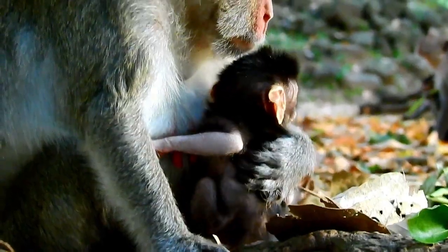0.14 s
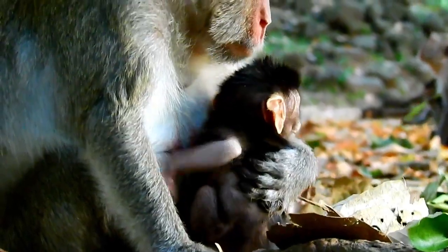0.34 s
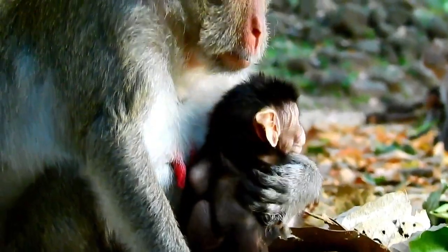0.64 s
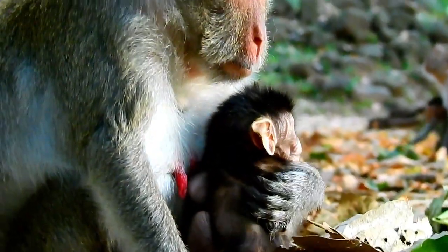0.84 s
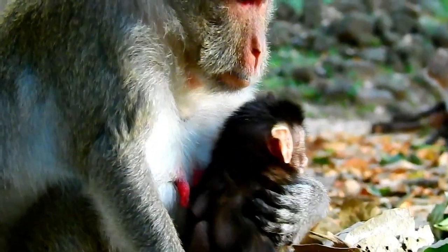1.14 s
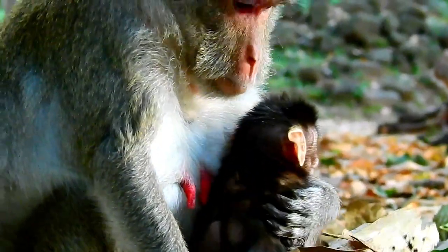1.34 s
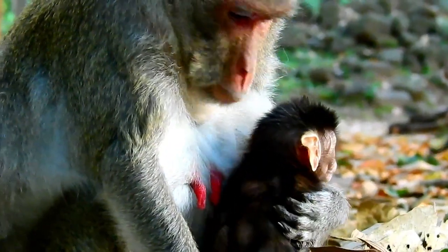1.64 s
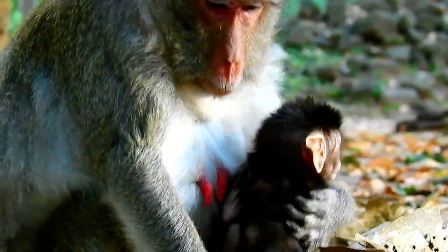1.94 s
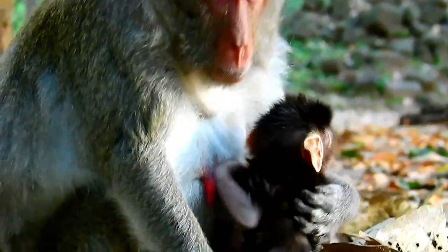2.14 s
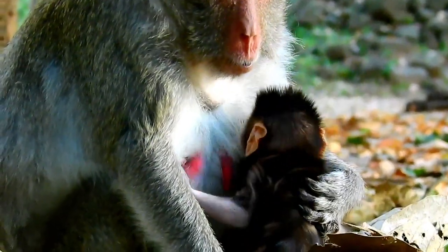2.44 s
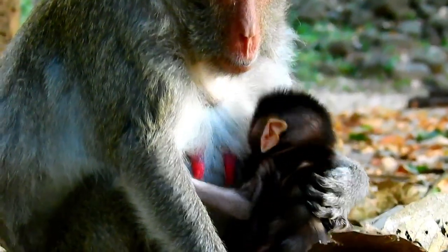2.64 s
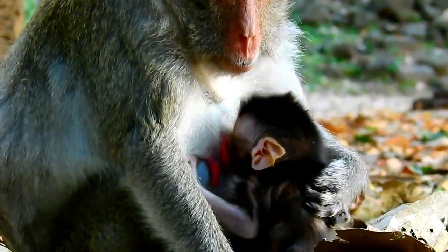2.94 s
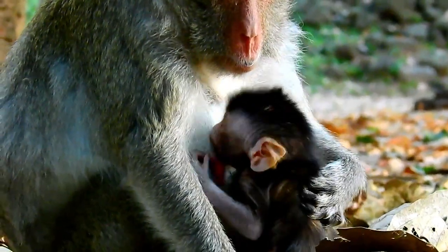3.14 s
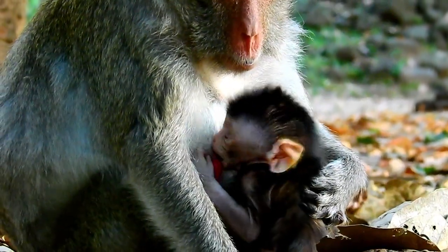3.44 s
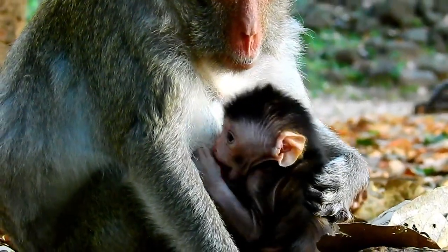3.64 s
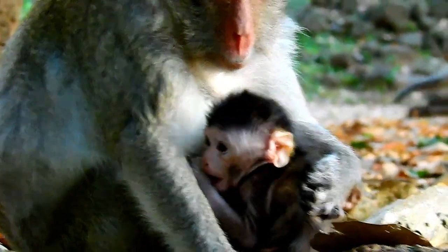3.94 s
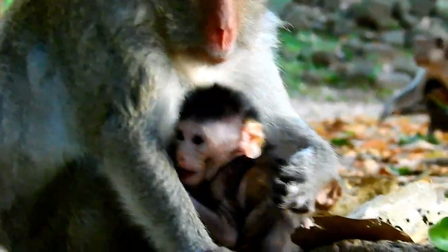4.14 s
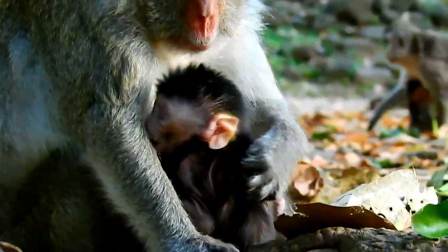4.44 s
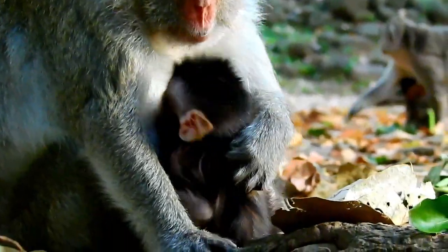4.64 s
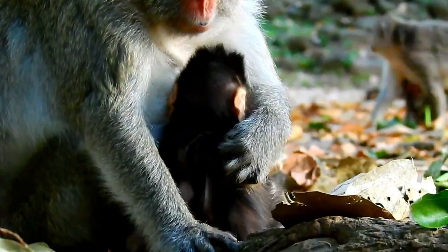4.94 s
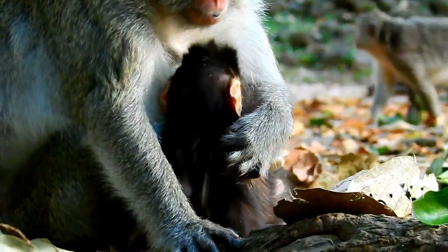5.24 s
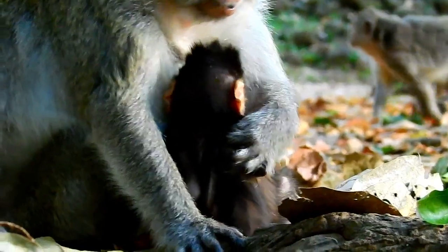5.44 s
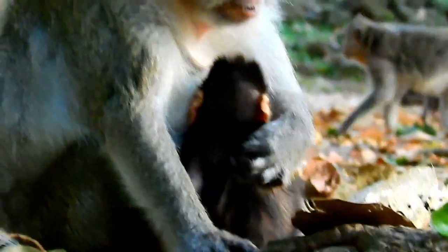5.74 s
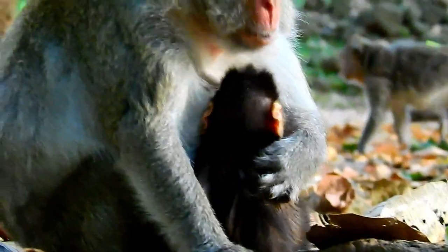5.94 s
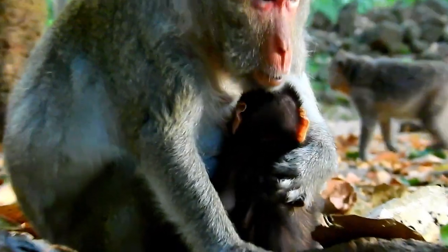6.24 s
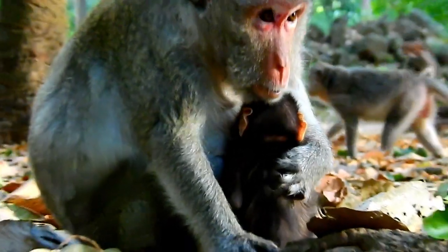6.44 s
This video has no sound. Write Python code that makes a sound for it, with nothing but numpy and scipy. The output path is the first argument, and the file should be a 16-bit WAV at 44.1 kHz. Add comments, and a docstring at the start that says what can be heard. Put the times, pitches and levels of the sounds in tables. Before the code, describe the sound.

An infant monkey close to a stereo microphone outdoors: faint whimper, quiet sliding coos, then shrill rasping squeals that break into whistles, building to one tearing scream. It fades to small broken chirps and breathy squeals with a brief woody reverberation. Behind it a far motor throbs, clatters and hisses by, sinks away, returns as a low idle later, and a faint thin whine appears at the end.

```python
"""Thin, breathy whimpers are heard first, then mostly falling coos, from a baby monkey on a forest floor;
whistles break into hoarse squeals, with one harsh scream in the middle and weaker, breathier cries after it.
The voice is wavering fold tones and puffed noise shaped by throat, mouth and teeth; trees give it a tail.
A small engine, puffing and clattering noise, putters past some way off; a faint tone whines at the end."""
import sys
import numpy as np
from scipy import signal
from scipy.fft import rfft, irfft
from scipy.io import wavfile
from scipy.ndimage import uniform_filter1d

SR = 44100
rng = np.random.default_rng(int(sys.argv[2]) if len(sys.argv) > 2 else 0)


def unload_audio(sound):
    """Save the sound as a 16-bit wav file, at the path given as the first command line argument."""
    columns = np.transpose(np.atleast_2d(sound))
    # keep every value between -1 and 1, then stretch to whole-number steps
    steps = np.round(np.clip(columns, -1, 1) * 32767)
    wavfile.write(sys.argv[1], SR, steps.astype(np.int16))


N = 290663
TIME = np.arange(N) / SR

# All levels are relative. A swell is the level change from the start to the end of the held part.
# Cries by kind [start t/s, length t/s, first pitch f/Hz, last pitch f/Hz, level/dB, swell/dB]:
# clear coos, mostly falling
COO_CRIES = [(.82, .22, 4170, 3432, -54.5, 5.5), (1.035, 0.11, 3403, 2285, -50.5, -12),
             (1.135, 0.2, 2310, 1698, -47.5, -10), (1.4, 0.079, 2130, 1997, -56.5, -3),
             (1.525, 0.13, 1952, 1852, -56, -16), (1.68, 0.13, 1702, 1593, -55.5, -26),
             (2.54, .18, 3193, 3080, -52.5, 4), (2.73, 0.11, 3130, 3490, -53.5, 9),
             (4.645, .125, 2777, 2060, -57.5, 12), (5.055, 0.18, 3084, 2025, -43.5, 5)]
# squeals, the folds' lower register
SQUEAL_CRIES = [(1.695, 0.25, 3807, 3280, -38, -10.5), (2.236, 0.24, 2985, 2704, -36.5, -5.5),
                (2.822, .21, 3780, 2758, -30.5, -4.5), (3.483, .11, 3747, 3787, -40.5, -8),
                (4.272, 0.046, 3685, 3350, -55.5, 1.5), (4.903, 0.084, 3126, 3150, -46.5, 9),
                (5.43, 0.064, 2800, 2927, -56.5, -4), (5.79, 0.17, 3146, 3368, -43, -3.5)]
# the voice cracks into a low rasp
CRACKED_CRIES = [(1.72, .12, 3172, 2810, -53, -11), (1.83, .11, 2800, 2170, -45.5, -4),
                 (2.33, 0.074, 2417, 1981, -47, 13), (2.45, 0.18, 1865, 1655, -57, -0.5),
                 (5.44, 0.112, 2400, 2287, -59.5, -19)]
# thin whistles, the upper register
WHISTLE_CRIES = [(1.61, .1, 6900, 5980, -42, 18), (1.77, .1, 6790, 6430, -31.5, 1),
                 (2.04, 0.078, 6310, 7660, -34.5, 7), (2.125, 0.14, 8190, 6100, -41, 10),
                 (2.37, .04, 6200, 6020, -33, -3), (4.447, 0.019, 8850, 9010, -52, -12),
                 (4.612, 0.075, 6400, 6130, -52.5, 15), (4.86, 0.0388, 6500, 6350, -49, 1),
                 (5.362, 0.043, 8280, 8150, -51, -6), (5.44, 0.054, 7950, 6920, -41.5, 6),
                 (5.735, .11, 9440, 7320, -65, -17)]
# breathy whimpers in the upper register
WHIMPER_CRIES = [(.49, 0.047, 6400, 6100, -53.5, 6), (.529, 0.083, 6260, 5740, -47.5, -8),
                 (.618, 0.16, 5750, 6450, -46, -4), (2.72, 0.097, 6450, 6300, -41.5, 13),
                 (3.185, .065, 6100, 6800, -34.5, 0), (3.459, 0.059, 6380, 6530, -47, 2),
                 (4.292, 0.0468, 6680, 6450, -55, -5), (6.03, 0.086, 6200, 6550, -44.5, -3),
                 (6.17, 0.13, 6100, 5550, -71, 9)]


def tonal_cries():
    """Register: coos and rough cracks bend slightly early, squeals earlier, whistles late; whimpers are
    breathy."""
    coos = cries(COO_CRIES, attack_s=0.011, release_s=0.023, bend=0.8, flutter_db=3.0,
                 waver=0.01042, rough=0.18, spread_hz=144, overtones_db=[-36])
    squeals = cries(SQUEAL_CRIES, attack_s=0.02, release_s=0.04, bend=0.6, flutter_db=2.1,
                    waver=0.022, rough=0.46, spread_hz=330, overtones_db=[-9, -13])
    cracks = cries(CRACKED_CRIES, attack_s=0.047, release_s=0.097, bend=0.78, flutter_db=4.0,
                   waver=0.04, rough=0.94, spread_hz=220, overtones_db=[-7])
    whistles = cries(WHISTLE_CRIES, attack_s=0.012, release_s=0.031, bend=3.2, flutter_db=1.5,
                     waver=0.013, rough=0.61, spread_hz=190, overtones_db=[])
    whimpers = cries(WHIMPER_CRIES, attack_s=0.01, release_s=0.02, bend=1.0, flutter_db=1.5,
                     waver=0.016, rough=0.6, spread_hz=550, overtones_db=[])
    return coos + squeals + cracks + whistles + whimpers


# hoarse air in the cries [start t/s, length t/s, attack t/s, throat level/dB, open mouth level/dB,
# hiss at the teeth level/dB, swell/dB, mouth resonance f/Hz]
HOARSE_AIR = [(1.29, 0.37, 0.01, -44, -60, -63, 10.5, 4674),
              (1.687, 0.26, 0.031, -32.5, -37.5, -52.5, -8.5, 4360),
              (2.005, 0.16, 0.017, -38, -52.5, -49, -4, 4500),
              (2.215, .22, 0.038, -31, -40, -47, -2.5, 4296),
              (2.675, 0.15, .02, -67, -54.5, -46.5, 8, 4500),
              (2.801, 0.22, 0.063, -27, -38, -45.5, -1, 4540),
              (3.141, .11, 0.037, -38, -40.5, -45.5, -8.5, 4800),
              (3.47, .14, 0.057, -35, -34, -65, -9, 4420), (4.024, 0.05, 0.018, -59, -46, -76, 6, 5000),
              (4.271, 0.045, 0.022, -72, -51.5, -84, -5.5, 3950),
              (4.455, 0.058, 0.032, -69.5, -91, -77.5, 1, 4505),
              (4.608, 0.081, 0.071, -54, -58, -66.5, 0.5, 4530),
              (4.845, 0.28, 0.17, -36.5, -45, -42, -17, 4943),
              (5.397, 0.15, 0.065, -42, -55, -47.5, 2.5, 4525),
              (5.752, 0.26, 0.1, -40, -48, -44.5, -6.5, 4520),
              (5.959, 0.14, 0.034, -59, -66, -50, -14, 4575),
              (6.121, 0.19, 0.034, -89, -68, -63.5, -11, 5240),
              (6.538, 0.051, 0.014, -74, -63, -64.5, 13, 5190)]
# noise colour of the throat [f/Hz, density level/dB per Hz]
THROAT_COLOUR = [(3900, -56), (4500, -33), (5300, -12), (6000, 6), (6700, 13), (7600, -7.5), (8600, -19),
                 (10000, -13), (13000, -46.5)]
# noise colour of the open mouth [f/Hz, density level/dB per Hz]
MOUTH_COLOUR = [(3000, -40.5), (3850, -14.5), (4200, -12), (4550, -8), (5000, -2), (5500, 1.5),
                (7000, -49.5)]
# noise colour of the hiss at the teeth [f/Hz, density level/dB per Hz]
TEETH_COLOUR = [(5000, -35.5), (8000, 2), (10000, 7.5), (11500, -2.5), (13000, -19.5), (14500, -33.5),
                (15700, -39)]
# air reaches the teeth first, then fills throat and mouth: (onset delay t/s, release t/s)
TEETH_TIMING, THROAT_TIMING, MOUTH_TIMING = (-0.027, 0.05), (0.0069, 0.041), (0.014, 0.017)
MOUTH_RING_DB, MOUTH_WIDTH_HZ = 0, 430  # the mouth's resonance against its broad rush of air


def rasp():
    """Turbulence: air torn by straining folds puffs unevenly through throat, teeth and a mouth reshaped per cry."""
    start_s, length_s, attack_s, throat_db, mouth_db, teeth_db, swell_db, mouth_hz = np.transpose(HOARSE_AIR)
    puffs = from_db(1.33 * drift(180))

    ringing = throat_rings(wander=0.025, swell_db=3.5)
    throat = (noise(THROAT_COLOUR, puffs) + np.sqrt(2) * ringing) / np.sqrt(3)

    centre_hz = glides(start_s, length_s, mouth_hz, mouth_hz, bend=1)
    mouth_ring = folds(centre_hz, waver=0.025, rough=0.8, spread_hz=MOUTH_WIDTH_HZ, overtones_db=[])
    mouth = rms_one(noise(MOUTH_COLOUR, puffs) + from_db(MOUTH_RING_DB) * mouth_ring)

    teeth = noise(TEETH_COLOUR, puffs)
    parts = [(throat, throat_db, THROAT_TIMING), (mouth, mouth_db, MOUTH_TIMING), (teeth, teeth_db, TEETH_TIMING)]
    total = 0
    for air, db, (delay_s, release_s) in parts:
        level = envelope(zip(start_s, length_s, attack_s, db, swell_db), release_s, delay_s)
        total = total + air * from_db(1.1 * drift(30)) * level
    return total


# shrill resonances of the throat [f/Hz, half width f/Hz, level/dB]
THROAT_RESONANCES = [(5900, 220, -7), (6500, 350, -4.5), (7430, 460, 0.5), (8500, 400, -5.5)]


def throat_rings(wander, swell_db):
    """Resonance: the strained throat changes shape, so each mode slides and swells on its own; unit power."""
    out = 0
    for hz, width_hz, db in THROAT_RESONANCES:
        phase = 2 * np.pi * np.cumsum(hz * (1 + wander * drift(14))) / SR
        ring = drift(width_hz) * np.cos(phase) + drift(width_hz) * np.sin(phase)
        out = out + from_db(db + swell_db * drift(16)) * ring
    power = uniform_filter1d(out ** 2, SR // 25)
    return rms_one(out / np.sqrt(power + 1e-9))  # evens out the level over 40 ms


# the scream, a short catch and then full force [start t/s, length t/s, attack t/s, level/dB,
# low resonance level/dB, low tone level/dB, low tone f/Hz, swell/dB]
SCREAM_BURSTS = [(3.652, .055, 0.018, -29, -55.5, -39.5, 1320, 0.5),
                 (3.73, 0.18, 0.033, -21, -36, -35, 1354, -6.5)]
# main noise colour of the scream [f/Hz, density level/dB per Hz]
SCREAM_HIGH_COLOUR = [(2600, -65), (3300, -10), (3800, 0.5), (5300, 4.5), (6000, 3.5), (6700, 0),
                      (7500, -14.5), (8300, -40.5), (9300, -36), (10100, -23.5), (12000, -44.5),
                      (15000, -64)]
# noise colour of its low resonance [f/Hz, density level/dB per Hz]
SCREAM_LOW_COLOUR = [(450, -48), (700, -39), (950, -23.5), (1150, -6.5), (1350, -1), (1650, -5), (1850, -9),
                     (2050, -1), (2300, 5), (2500, -7), (2750, -3.5), (3100, -5), (4200, -54)]


def scream():
    """Deterministic chaos: at full force the folds vibrate chaotically, as noise, over a rough low tone."""
    start_s, length_s, attack_s, high_db, low_db, tone_db, tone_hz, swell_db = np.transpose(SCREAM_BURSTS)
    puffs = from_db(0.77 * drift(300))
    pitch = glides(start_s, length_s, tone_hz, tone_hz, bend=1)
    tone = folds(pitch, waver=0.022, rough=0.6, spread_hz=78, overtones_db=[-22, -8, -6])
    high, low = noise(SCREAM_HIGH_COLOUR, puffs), noise(SCREAM_LOW_COLOUR, puffs)
    total = 0
    for sound, db in [(high, high_db), (low, low_db), (tone, tone_db)]:
        total = total + sound * envelope(zip(start_s, length_s, attack_s, db, swell_db), release_s=0.064)
    return total


def cries(table, attack_s, release_s, bend, flutter_db, waver, rough, spread_hz, overtones_db):
    """Source and modulation: the folds play cries of one kind, each a glide under an unsteady envelope."""
    start_s, length_s, first_hz, last_hz, db, swell_db = np.transpose(table)
    level = envelope(zip(start_s, length_s, [attack_s] * len(table), db, swell_db), release_s)
    pitch = glides(start_s, length_s, first_hz, last_hz, bend)
    flutter = from_db(flutter_db * drift(23))
    return level * flutter * folds(pitch, waver, rough, spread_hz, overtones_db)


def folds(pitch, waver, rough, spread_hz, overtones_db):
    """Self-oscillation: pitch wavers and a rough share of the power smears to both sides of each partial."""
    phase = 2 * np.pi * np.cumsum(pitch * (1 + waver * drift(90))) / SR
    rough = np.clip(rough, 0, 1)
    wave = 0
    for k, db in enumerate([0] + overtones_db, 1):
        smear = drift(k * spread_hz) + 1j * drift(k * spread_hz)
        swing = np.sqrt(1 - rough) + np.sqrt(rough / 2) * smear
        wave = wave + from_db(db) * np.real(swing * np.exp(1j * k * phase))
    return rms_one(wave)


def envelope(rows, release_s, delay_s=0):
    """Amplitude modulation: each cry eases in, swells or sags evenly in dB while held, and is let go."""
    out = np.zeros(N)
    for start_s, length_s, attack_s, db, swell_db in rows:
        span = slice(*np.searchsorted(TIME, [start_s + delay_s, start_s + length_s + release_s]))
        t = TIME[span] - start_s
        rise = np.sin(np.pi / 2 * np.minimum((t - delay_s) / attack_s, 1))
        fall = np.minimum(1 - (t - length_s) / release_s, 1)
        held = from_db(db + swell_db * (np.clip(t / length_s, 0, 1) - 0.5))
        out[span] = np.maximum(out[span], held * (rise * fall) ** 2)
    return out


def glides(start_s, length_s, first_hz, last_hz, bend):
    """Frequency glide: each cry slides between two pitches, early if bend is under 1, late if it is over."""
    pitch = np.full(N, first_hz[0])
    for start, length, first, last in zip(start_s, length_s, first_hz, last_hz):
        begun = TIME >= start
        progress = np.minimum((TIME[begun] - start) / length, 1)
        pitch[begun] = first + (last - first) * progress ** bend
    return pitch


# tail among the trees [band centre f/Hz, 60 dB decay t/s, level against the direct sound/dB,
# left-right likeness 0-1]
FOREST_TAIL = [(1310, 0.4, -3.5, 0.9), (2900, 0.48, -1, 0.79), (4054, 0.48, 1, 0.6), (6500, 0.45, -2, 0.17),
               (11300, 0.19, -2.5, 0)]


def forest(x):
    """Reverberation: trunks and leaves scatter a tail, longest mid-range, less alike on both sides in the treble."""
    t, centres = TIME[:SR], [row[0] for row in FOREST_TAIL]
    shared, left, right = rng.standard_normal((3, SR))
    response = np.zeros((2, SR)) + (t == 0)  # the direct sound
    for own, (hz, t60, wet_db, alike) in zip(np.eye(len(FOREST_TAIL)), FOREST_TAIL):
        alike = np.clip(alike, 0, 1)
        band = np.interp(np.arange(SR // 2 + 1), centres, own)
        sides = np.sqrt(alike) * shared + np.sqrt(1 - alike) * np.array([left, right])
        scatter = irfft(rfft(sides) * band, SR)
        decay = from_db(-60 * t / t60) * np.clip(t / 0.011, 0, 1)
        response += from_db(wet_db) * scatter * decay / np.linalg.norm(decay)
    return from_db(-4.0) * signal.fftconvolve(x[None], response, axes=1)[:, :N]


# low idling throb that sinks, then swells again late [t/s, level/dB]
IDLE_CURVE = [(0, -70), (3.2, -79.5), (4.7, -72), (5.03, -62.5), (5.5, -62.5), (6.12, -63.5), (6.3, -68),
              (6.59, -72)]
# the engine's clatter [t/s, level/dB]
CLATTER_CURVE = [(.15, -70), (.5, -80), (1.0, -74.5), (1.25, -63.5), (1.65, -59), (2.55, -64.5), (3.0, -66),
                 (3.35, -77), (3.9, -71.5), (4.3, -92.5), (5.0, -81), (5.9, -79.5), (6.2, -71), (6.59, -82)]
# a hiss that swells and fades with the passing engine, as of wheels [t/s, level/dB]
WHEEL_CURVE = [(.2, -60), (.5, -65), (1.0, -57.5), (1.85, -47.5), (2.3, -57.5), (2.65, -56.5), (3.4, -82),
               (4.6, -80.5), (6.59, -78)]
# colours of exhaust, idling throb, clatter and wheel hiss, each [f/Hz, density level/dB per Hz]
EXHAUST_COLOUR = [(18, -46.5), (30, -12.5), (43, -5.5), (76, -5.5), (98, -0.5), (167, -0.5), (208, -5.5),
                  (249, -1), (278, -3.5), (325, -10), (430, -28), (560, -57), (950, -120)]
IDLE_COLOUR = [(18, -48.5), (30, -26), (64, -10), (81, -9.5), (108, 4.5), (129, -1.5), (182, -13),
               (252, -13.5), (430, -29.5), (560, -61.5), (950, -120)]
CLATTER_COLOUR = [(300, -24.5), (420, -18.5), (510, 9), (570, -0.5), (620, 3), (720, 0), (860, 2.5),
                  (980, 5.5), (1120, 2.5), (1450, 3.5), (1750, -4.5), (3000, -19), (8000, -32.5)]
WHEEL_COLOUR = [(500, -39.5), (1100, -11), (1700, -1.5), (2600, -0.5), (4200, -0.5), (5500, 3), (6800, 3.5),
                (8000, -9.5), (10000, -22), (15000, -40.5)]
FIRING_HZ = 25.1  # mean rate
NEAREST_S, NEAR_FOR_S = 2.057, 0.29  # when it is nearest, and for how long it stays about that near
EXHAUST_DB, EXHAUST_LOSS_DB = -51.5, 8.5  # level when nearest, loss per doubling of distance


def engine():
    """Distance loss: each firing puffs through the exhaust, a dull throb far off; clatter and hiss travel along."""
    idle_db, = in_time(IDLE_CURVE)
    clatter_db, = in_time(CLATTER_CURVE)
    wheels_db, = in_time(WHEEL_CURVE)
    distance = np.hypot(1, (TIME - NEAREST_S) / NEAR_FOR_S)  # in units of the nearest distance
    near_db = EXHAUST_DB - EXHAUST_LOSS_DB * np.log2(distance)

    cycle = np.cumsum(FIRING_HZ * (1 + 0.0091 * drift(1.8))) / SR % 1
    puffs = 0.38 + np.exp(-cycle / 0.64)
    near = from_db(near_db) * wide(EXHAUST_COLOUR, side_db=-22, puffs=puffs)
    far = from_db(idle_db) * wide(IDLE_COLOUR, side_db=-23, puffs=puffs)
    no_deep_bass = signal.butter(4, 45, "high", fs=SR, output="sos")  # as from a small pipe
    exhaust = signal.sosfilt(no_deep_bass, near + far)

    clatter = from_db(clatter_db + 2.95 * drift(8.7)) * wide(CLATTER_COLOUR, side_db=-17)
    wheels = from_db(wheels_db) * wide(WHEEL_COLOUR, side_db=-8)
    return exhaust + clatter + wheels


def wide(spectrum, side_db, puffs=1):
    """Partial coherence: distant noise differs a little between the sides."""
    middle = noise(spectrum, puffs)
    side = from_db(side_db) * noise(spectrum, puffs)
    return middle + side * [[1], [-1]]


# a far whine [start t/s, length t/s, first pitch f/Hz, last pitch f/Hz, level/dB, swell/dB]
FAR_WHINE = [(6.25, 0.35, 951, 934, -74, 15.5)]


def whine():
    """Narrow-band tone: a faint, thin, slowly sinking pitch from far away."""
    return cries(FAR_WHINE, attack_s=0.08, release_s=0.039, bend=0.6, flutter_db=2.5,
                 waver=0.006, rough=0.25, spread_hz=174, overtones_db=[])


def noise(spectrum, puffs=1):
    """Spectral shaping: noise, steady or in puffs, through a body of the given colour; unit power."""
    source = puffs * rng.standard_normal(N)
    return rms_one(irfft(rfft(source) * from_db(at_bins(spectrum)), N))


def drift(rate_hz):
    """Low-passed randomness: wander up to the given rate, spread 1."""
    lowpass = signal.butter(4, rate_hz, fs=SR, output="sos")
    settled = signal.sosfilt(lowpass, rng.standard_normal(N + SR))[SR:]
    return rms_one(settled)


def from_db(db):
    """Logarithmic level: decibels to gain."""
    return 10 ** (np.asarray(db) / 20)


def rms_one(x):
    """Mean square: scale to unit power."""
    return x / np.sqrt(np.mean(x ** 2) + 1e-20)


def in_time(rows):
    """Linear interpolation: the columns of a curve at every sample."""
    s, *columns = np.transpose(rows)
    return [np.interp(TIME, s, c) for c in columns]


def at_bins(points):
    """Log-frequency interpolation: a table read at every bin of the spectrum."""
    hz, value = np.transpose(points)
    bin_hz = np.arange(N // 2 + 1) * SR / N
    return np.interp(np.log(bin_hz + 1), np.log(hz), value)


# the microphone pair [f/Hz, phase by which the left leads/rad]
PORT_LEAD = [(100, 0), (2900, .02), (3700, .1), (5500, .47), (7000, 1.05), (8200, 1.9), (10400, 2.6),
             (12500, 3.0), (16000, 3.1)]


def scene():
    """Phase difference: the close monkey reaches two microphone ports out of step in the treble."""
    voice = forest(tonal_cries() + rasp() + scream())
    turn = np.exp(0.5j * at_bins(PORT_LEAD) * [[1], [-1]])  # half the lead to each side
    # treble lift: (f/Hz, level/dB)
    lift = from_db(at_bins([(3000, 0.65), (6000, 0.47), (8000, 1.7), (11000, 2.7), (15000, 22.0)]))
    at_ports = irfft(rfft(voice) * turn * lift, N)
    return (at_ports + engine() + whine()) * from_db([[0.25], [-0.25]])  # left slightly louder


def record(dry):
    """Band limiting: a steep low-pass cuts the top, run both ways to keep the phase."""
    lowpass = signal.ellip(10, 0.1, 70, 15700, fs=SR, output="sos")  # cutoff 15700 Hz
    return signal.sosfiltfilt(lowpass, dry)


dry = scene()
out = record(dry)
unload_audio(out)
```